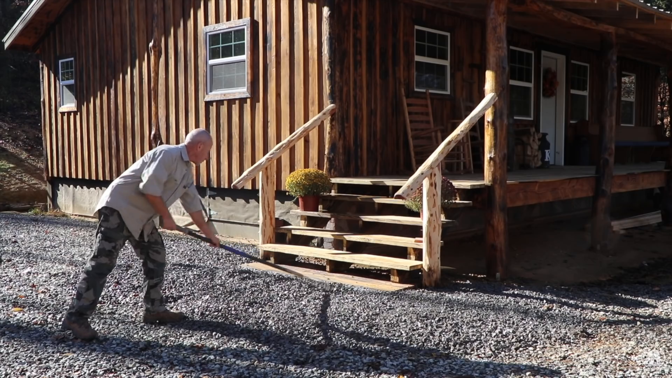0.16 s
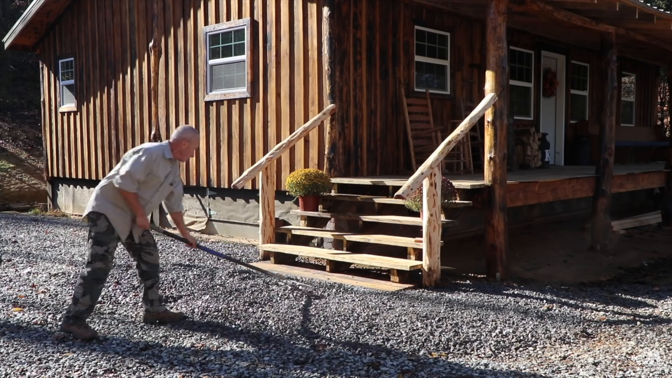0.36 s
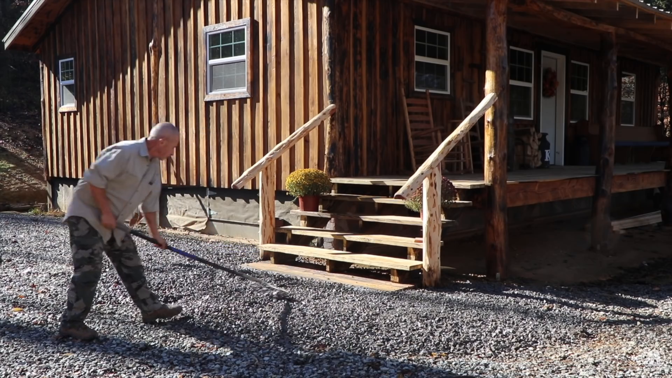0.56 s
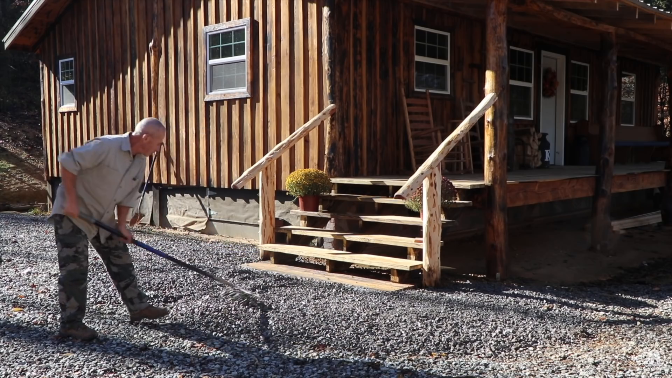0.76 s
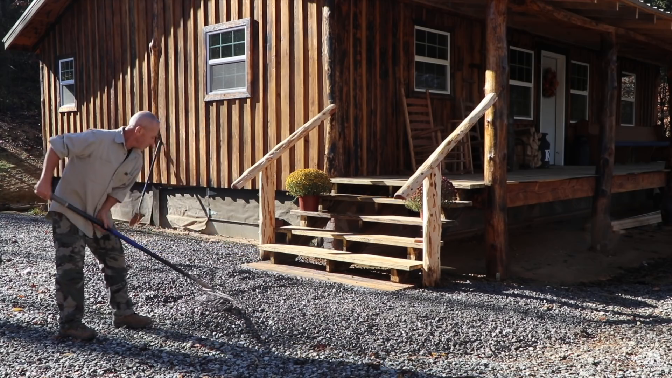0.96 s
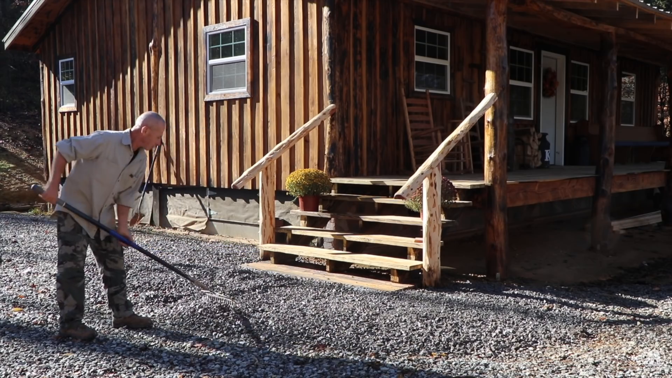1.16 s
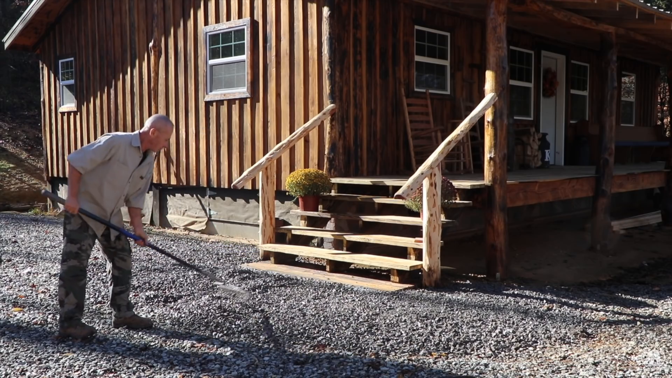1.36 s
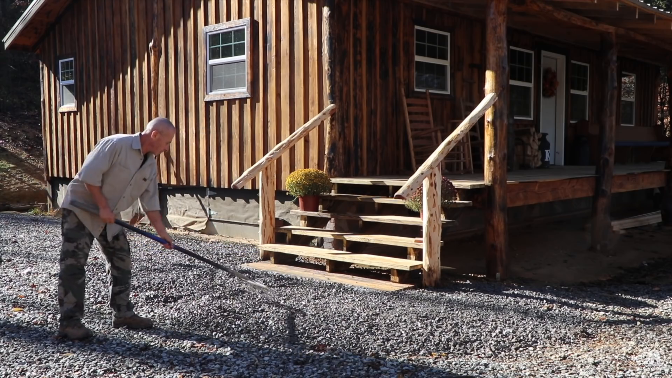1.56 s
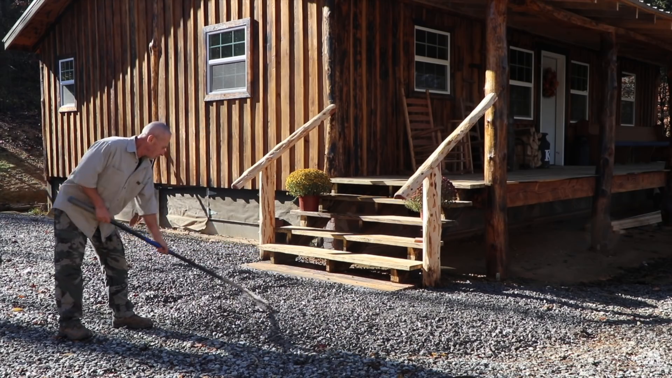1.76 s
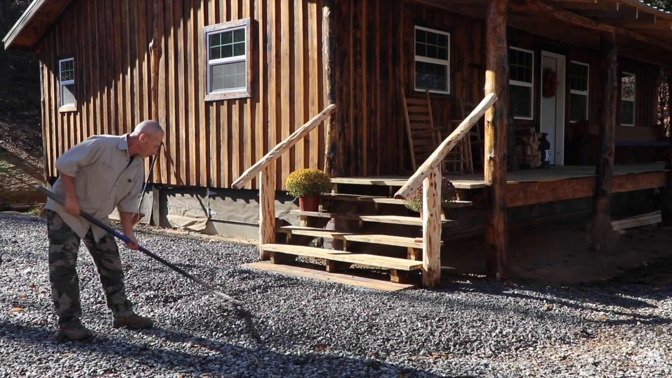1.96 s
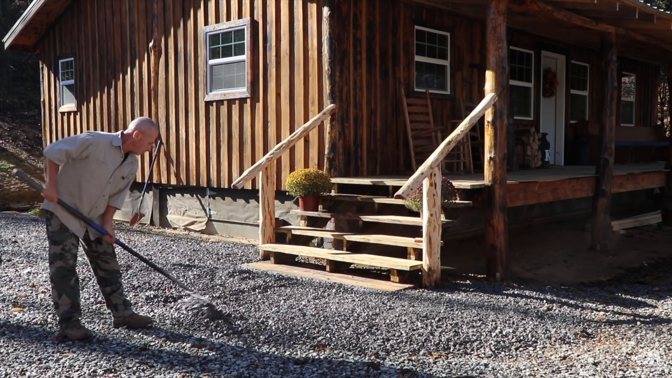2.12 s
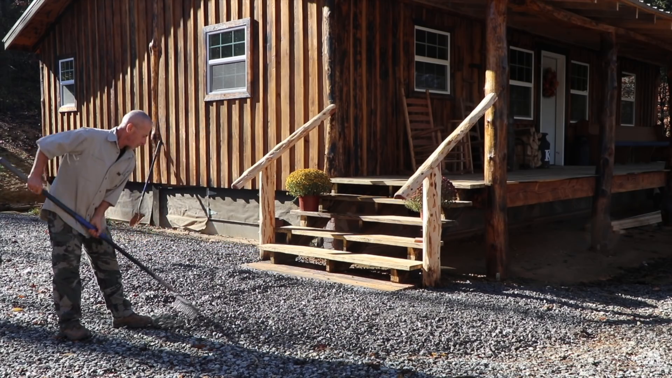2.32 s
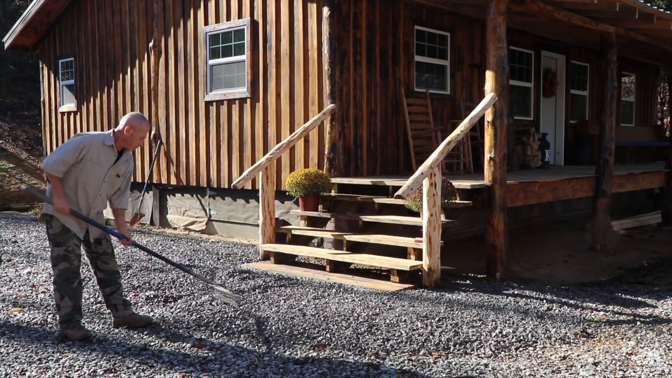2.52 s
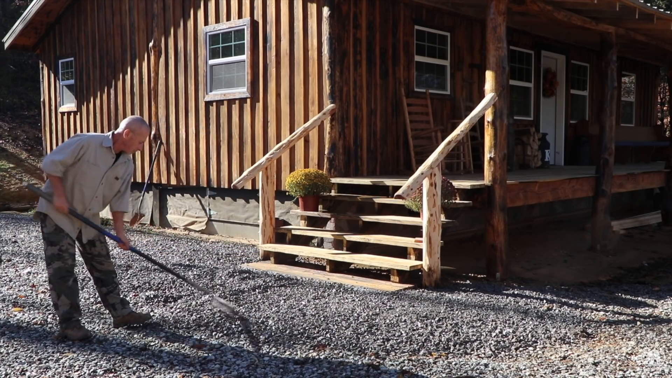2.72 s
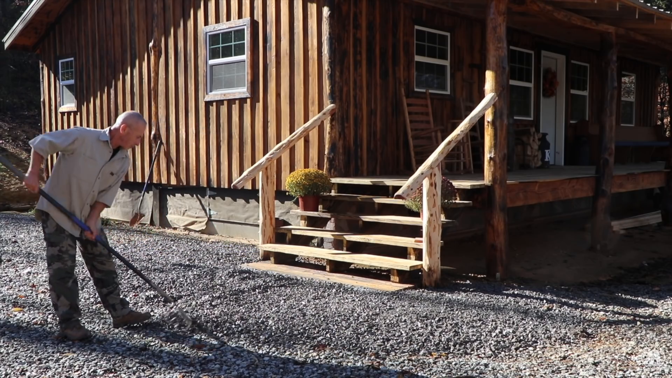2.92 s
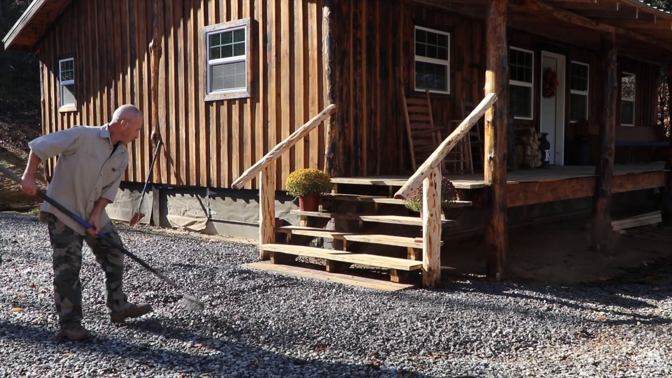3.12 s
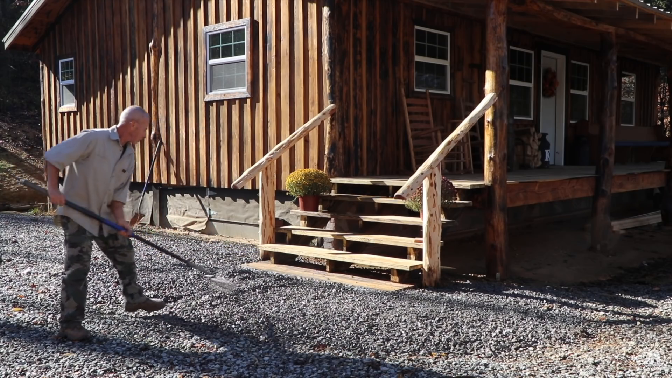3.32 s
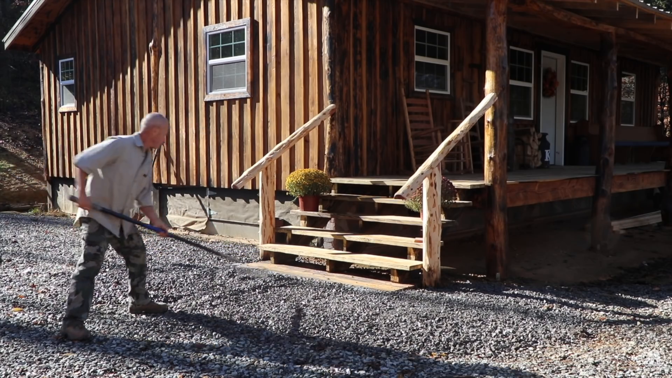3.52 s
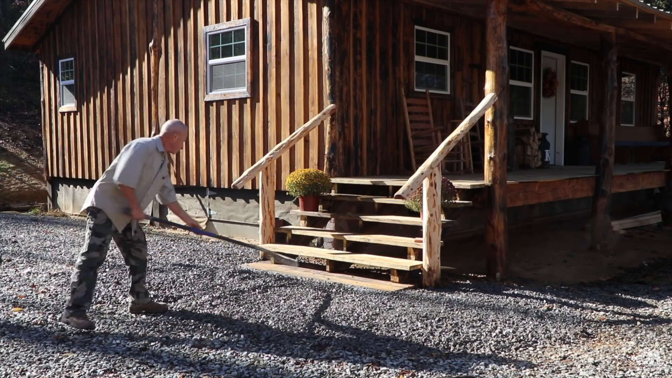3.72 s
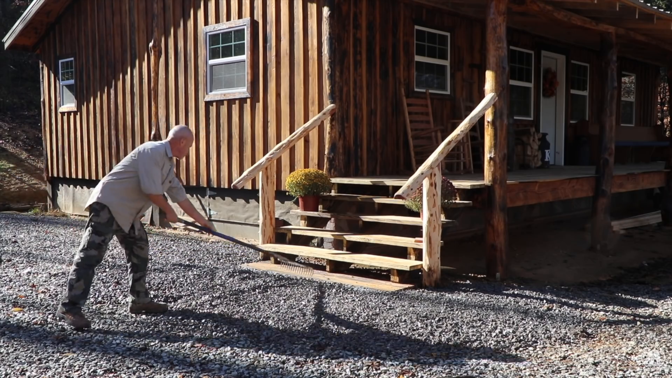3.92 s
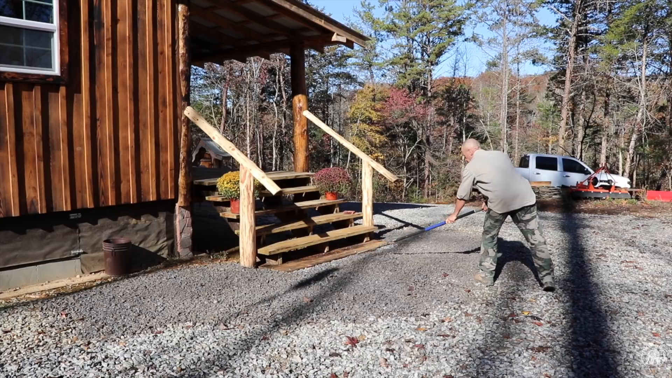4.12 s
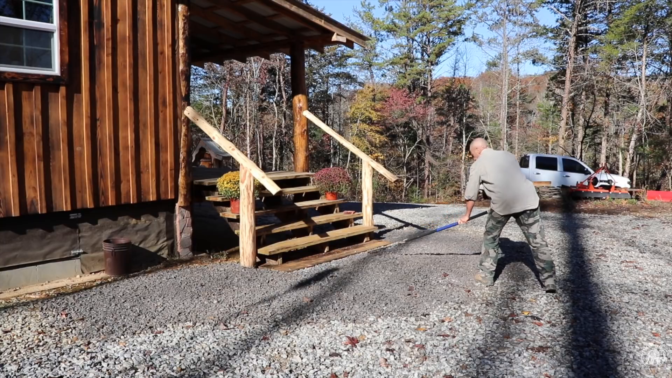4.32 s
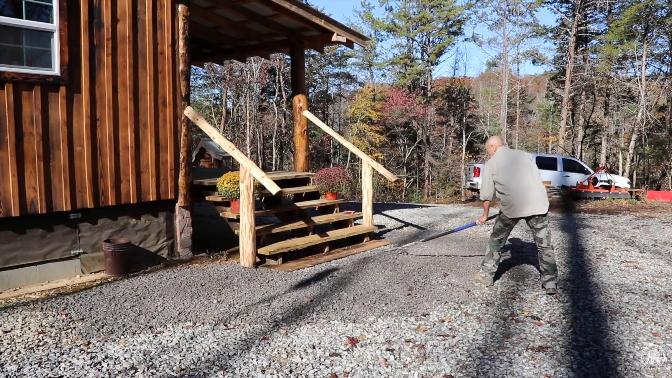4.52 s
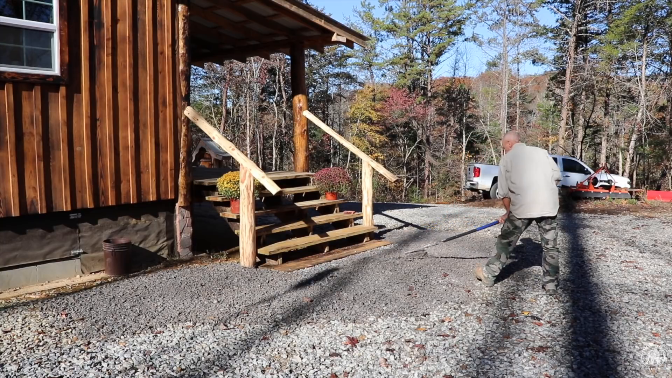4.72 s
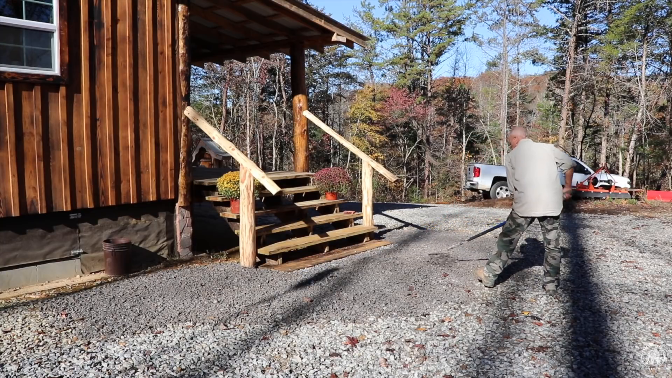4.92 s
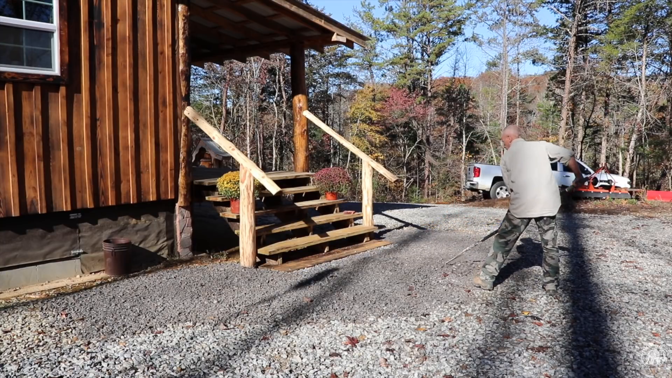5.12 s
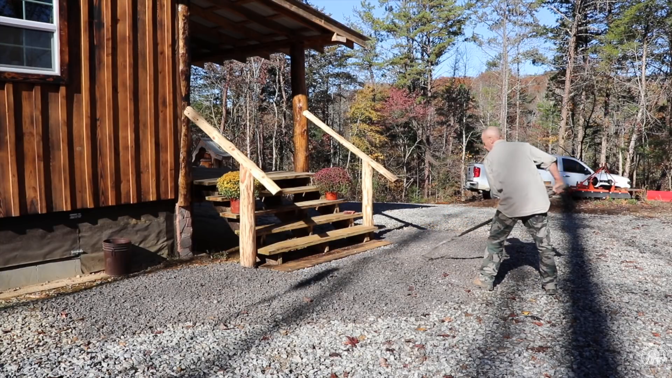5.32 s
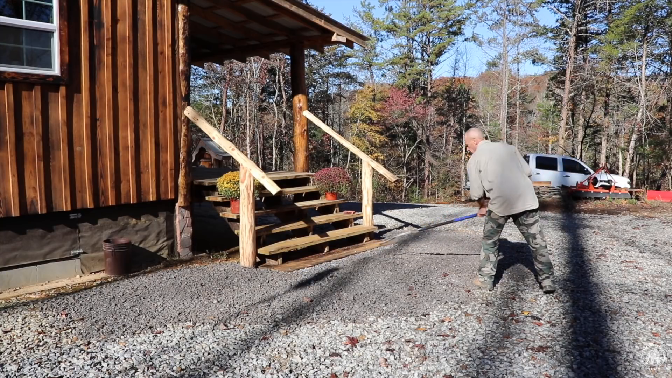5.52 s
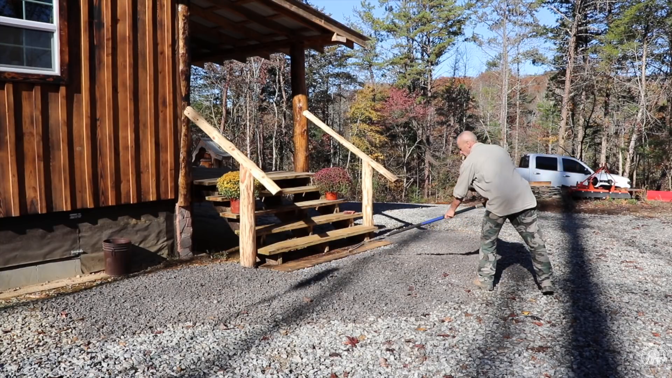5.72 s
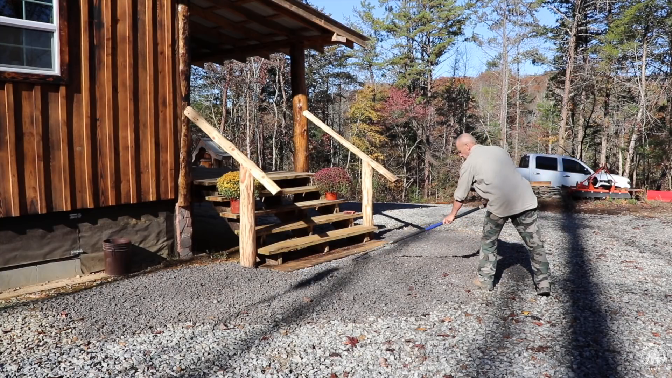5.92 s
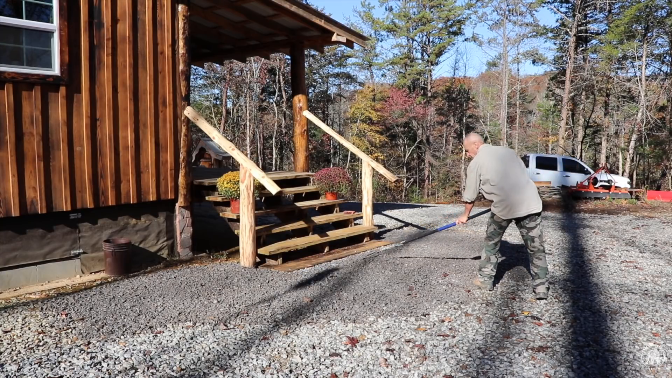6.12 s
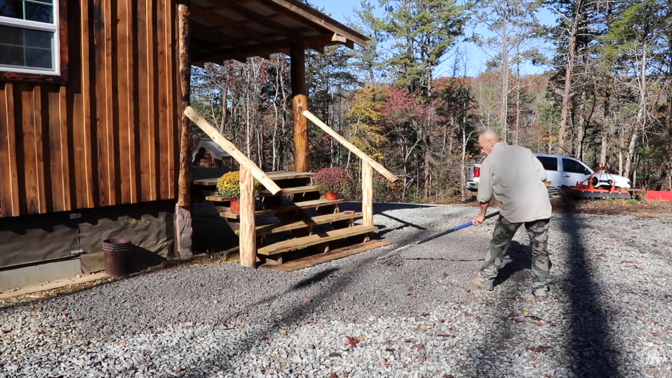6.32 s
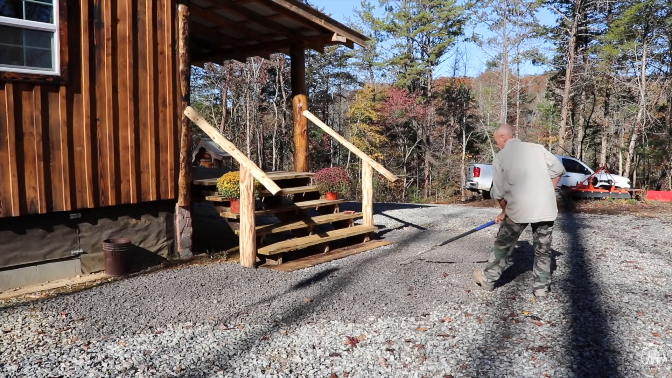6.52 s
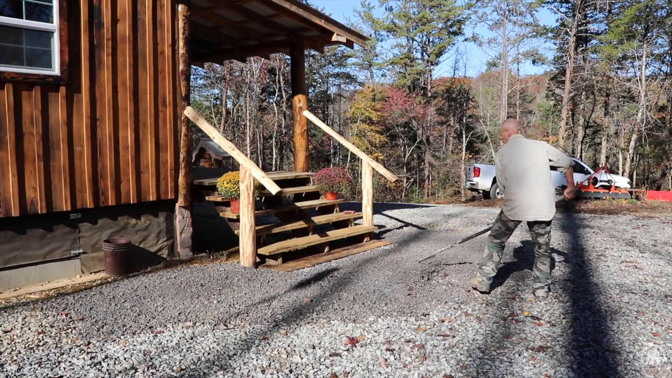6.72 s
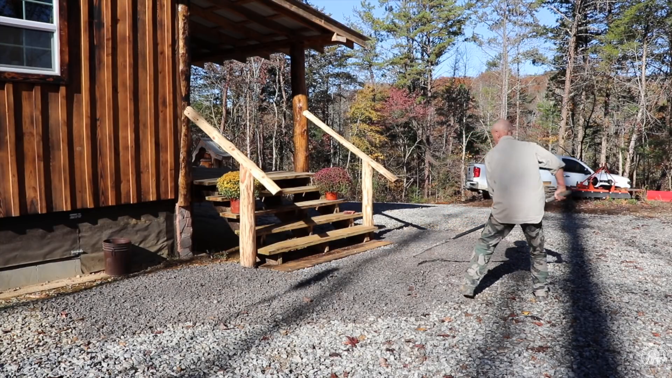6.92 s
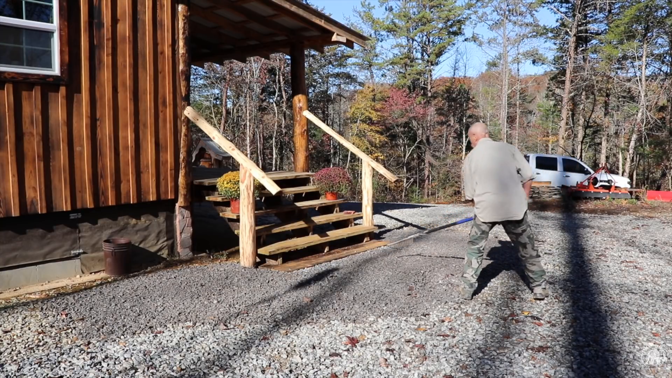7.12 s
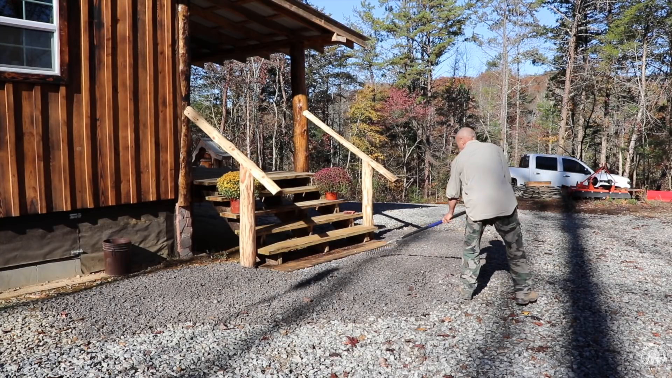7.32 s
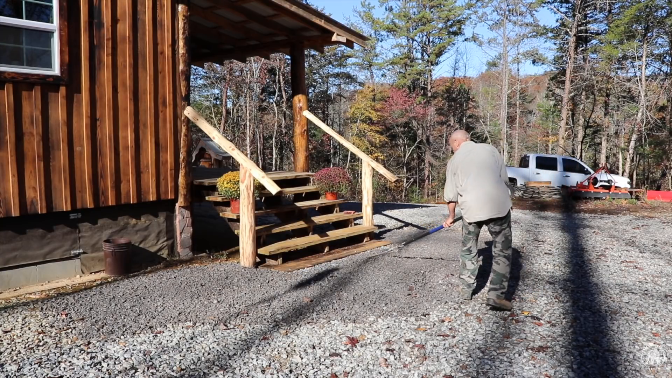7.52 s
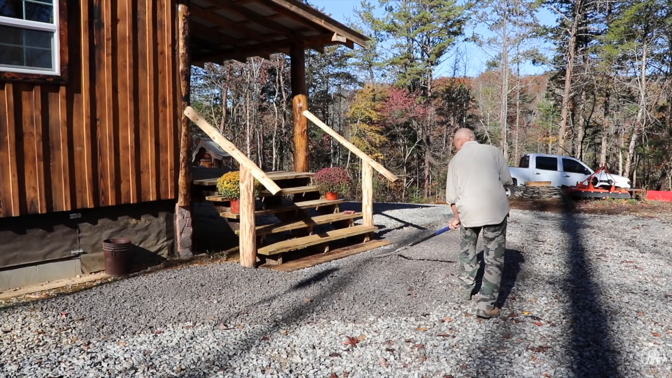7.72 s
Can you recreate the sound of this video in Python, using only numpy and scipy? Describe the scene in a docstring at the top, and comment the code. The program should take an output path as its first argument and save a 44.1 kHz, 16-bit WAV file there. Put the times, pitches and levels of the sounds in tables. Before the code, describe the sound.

A steel rake drags and shoves through loose gravel in uneven crunching strokes, tines ringing and clattering, outdoors beside a wooden cabin.

```python
"""A steel rake is pulled and pushed back through loose gravel by a wooden cabin, first from the side, then from behind.
The tines shove stones: random knocks in little slips ring stone modes and the steel, and fine chips spill after.
The landing head, struck stones and dull thuds are short filtered noise bursts; boots also grind on the drive.
The cabin wall throws back a short echo with a faint tail, over a quiet hush of outdoor air."""
import sys
import numpy as np
from scipy import signal
from scipy.fft import rfft, irfft
from scipy.io import wavfile
from scipy.ndimage import uniform_filter1d

SR = 44100
rng = np.random.default_rng(int(sys.argv[2]) if len(sys.argv) > 2 else 0)


def transcribe(u):
    """Save the signal u as a 16-bit wav file named by the first command-line argument.

    u: samples, shape (n,) or (channels, n), limited to [-1, 1]; the rate is SR.
    q: integer samples, one column per channel.
    """
    v = np.clip(np.atleast_2d(u).T, -1, 1)
    q = np.round(v * 32767).astype(np.int16)
    wavfile.write(sys.argv[1], SR, q)


N = 347067
TIME = np.arange(N) / SR

# Drags of the tines through the gravel; the bite is the pitch at which the steel rings most:
# (start [s], attack [s], drag [s], slowing [s], crunch before trim [dB], swell over the drag [dB],
#  heap re crunch [dB], chips re crunch [dB], first bite [Hz], last bite [Hz], ringing [dB])
STROKES = [(-.03, .11, .33, 0.77, -23.5, -2, 1, -12.5, 1200, 1650, 1.5),
           (.47, .05, .48, .25, -23, 1, -7, -12, 1680, 2950, 1),
           (1.125, 0.058, 0.2, 0.087, -33, 0.5, -8.5, -20, 2930, 2860, -3.5),
           (1.73, 0.077, 0.32, 0.67, -21.5, -1, -6, -12.5, 3420, 3720, -5.5),
           (2.695, .065, 0.18, 0.2, -19.5, -3, -5, -6.5, 3740, 4370, -7),
           (4.06, 0.094, .84, 0.51, -28, 4, -7.5, -14, 3060, 3254, -1.5),
           (5.245, 0.039, .12, .11, -28.5, -2.5, -3, -20, 960, 963, -2.5),
           (5.865, 0.023, 0.57, 0.31, -31, -1, -6.5, -10.5, 3270, 3800, -8.5),
           (6.39, 0.12, 0.14, 0.35, -27, 1, -8.5, -11.5, 4060, 4500, -11),
           (7.412, 0.031, 0.4, .2, -33.5, 2, 2, -10.5, 1090, 1225, 1.5)]
# Resonances of the rake head and its tines: (pitch [Hz], width [Hz], relative level [dB])
STEEL_MODES = [(1000, 570, -4), (1231, 190, -5.5), (1684, 270, 0.5), (1820, 440, -17), (2080, 240, 5),
               (2486, 380, -1.5), (2818, 210, 5), (2990, 480, 3.5), (3420, 540, 5.5), (4690, 580, 2.5),
               (5160, 310, -16)]
# The rake head drops on the gravel: (time [s], clatter peak [dB], crunch before trim [dB],
#  heap re crunch [dB], chips re crunch [dB])
LANDINGS = [(1.686, -16, -30.5, -6.5, -15), (2.669, -12, -23, -6.5, -12.5), (4.044, -16.5, -24, -13, -23.5),
            (5.266, -11, -34, -15, -15), (5.859, -11, -22.5, -10.5, -12.5), (7.422, -12.5, -27.5, 2.5, -14)]


def undb(db):
    """Decibels to amplitude gain."""
    return 10 ** (np.asarray(db) / 20)


def unit(x):
    """Scale to an RMS of one."""
    return x / np.sqrt(np.mean(x ** 2) + 1e-18)


def even(x, size=6600):
    """Unit level over each 0.15 s, keeping the crackle within it."""
    return x / np.sqrt(np.maximum(uniform_filter1d(x ** 2, size), 0) + 1e-18)


def band(x, lo_hz, hi_hz, order=3):
    """Butterworth band-pass."""
    edges_hz = [lo_hz, min(hi_hz, SR / 2 - 1)]
    return signal.sosfilt(signal.butter(order, edges_hz, "band", fs=SR, output="sos"), x + 1e-18)


def ring(x, hz, width_hz):
    """One resonance, gain 1 at its centre."""
    return signal.lfilter(*signal.iirpeak(min(hz, SR / 2 - 1), hz / width_hz, SR), x + 1e-18)


def colour(x, points, size=2048):
    """Minimum-phase filter through (pitch [Hz], level [dB]) points, so clicks keep their sharp front."""
    hz, db = np.transpose(points)
    bins_hz = np.arange(size // 2 + 1) * SR / size
    gain = undb(np.interp(np.log(bins_hz + 1), np.log(hz), db))
    # folding the cepstrum makes the response causal
    cepstrum = irfft(np.log(gain))
    cepstrum[1:size // 2] *= 2
    cepstrum[size // 2 + 1:] = 0
    response = irfft(np.exp(rfft(cepstrum)))
    return signal.fftconvolve(x, response)[:len(x)]


def add(out, s, x):
    """Mix x into out at s seconds."""
    i = max(int(s * SR), 0)
    out[i:i + len(x)] += x[:N - i]


def burst(decay_s, size=8192):
    """Noise that starts at once and dies away exponentially."""
    return rng.standard_normal(size) * np.exp(-TIME[:size] / decay_s)


def raking(gains, tone, knocks_per_s, spread_db, creep, ring_db, trims_db):
    """The harder the pull, the more stones knock; the heap rumbles below them and chips spill above."""
    # as the pull eases the creep dies first, leaving separate ticks
    effort = np.sqrt(gains[1] / gains[1].max())
    knocks = collisions(knocks_per_s * (.2 + effort), spread_db,
                        slips_per_s=130, slip_s=.0036, creep=creep * (.16 + effort))
    gravel = unit(colour(stones(knocks), tone))
    both = gravel + undb(ring_db) * tines(knocks)
    heap = band(both, 70, 1480, order=5)
    crunch = band(both, 1480, 6400, order=5)
    chips = band(gravel, 6400, 19000, order=5)  # the steel adds nothing up here
    return sum(even(part) * gain * undb(db)
               for part, gain, db in zip((heap, crunch, chips), gains, trims_db))


def collisions(rate, spread_db, slips_per_s, slip_s, creep):
    """Sizes of stone knocks: a creep, and little avalanches that start at once and run out."""
    slips = (rng.random(N) < slips_per_s / SR) * rng.random(N) ** 3  # mostly small, a few large
    push = creep + signal.lfilter([1], [1, -np.exp(-1 / (slip_s * SR))], slips)
    size = undb(spread_db * np.minimum(rng.exponential(size=N), 3.5)) * push
    return size * (rng.random(N) < rate / SR)


def patchy_noise(patchy_db=2.5, per_s=60):
    """Random strengths that swell and fade as different stones pass under the tines."""
    steps = np.clip(rng.standard_normal(2000), -2, 2)
    walk = np.interp(TIME * per_s, np.arange(2000), steps)
    return rng.standard_normal(N) * undb(patchy_db * walk)


def strike(knocks, chance):
    """Every knock meets a given mode with its own strength and sign."""
    return knocks * np.roll(chance, rng.integers(N))


def stones(knocks, sharpness=14, count=40):
    """Each knock rings its own mix of short stone modes."""
    chance = patchy_noise()
    pitches_hz = np.linspace(np.sqrt(130), np.sqrt(16000), count) ** 2  # closer together in the bass
    return sum(ring(strike(knocks, chance), hz, hz / sharpness + 60) for hz in pitches_hz)


def tines(knocks, focus=6.7, skirt=0.63, glide_half_width_hz=170, glide_db=-1):
    """The knocks ring the steel, most strongly around the bite pitch, where a gliding scrape sounds too."""
    bite_hz, bite_db = bite()
    chance = patchy_noise(patchy_db=2)
    low_pass = signal.butter(2, glide_half_width_hz, fs=SR, output="sos")
    scrape = signal.sosfilt(low_pass, strike(knocks, chance) + 1e-18)
    carrier = np.cos(2 * np.pi * np.cumsum(bite_hz) / SR)  # lifts the scrape to the bite pitch
    out = unit(scrape * carrier) * undb(glide_db)
    for hz, width, db in STEEL_MODES:
        share = skirt + np.exp(-(focus * np.log(hz / bite_hz)) ** 2)
        mode = ring(ring(strike(knocks, chance), hz, width), hz, 2 * width)
        out = out + unit(mode) * share * undb(db)
    return out * undb(bite_db)


def bite(lead_s=.04, ring_fall_db_per_s=35):
    """Pitch (Hz) and strength (dB) of the ringing: set as the tines go in, it glides over each drag, then fades."""
    hz, db = np.ones(N), np.zeros(N)
    for s, _, drag_s, *_, first_hz, last_hz, ring_db in STROKES:
        since = TIME >= s - lead_s
        age = TIME[since] - s
        hz[since] = first_hz * (last_hz / first_hz) ** np.clip(age / drag_s, 0, 1)
        db[since] = ring_db - ring_fall_db_per_s * np.maximum(age - drag_s, 0)
    return hz, db


def motion(start_s, attack_s, hold_s, release_s, crunch_db, heap_db, chips_db,
           settle_db=-14.5, settle_db_per_s=48):
    """Gains of heap, crunch and chips for one movement: it sets in, holds, slows, and the stones settle."""
    # How steeply (heap, crunch, chips) fade as the motion stops [exponent of speed]
    slowing_powers = (1.4, 1.5, 1)
    age = TIME - start_s
    late = np.maximum(age - hold_s, 0)
    speed = np.clip(1 - late / release_s, 0, 1)
    settling = undb(settle_db - settle_db_per_s * late)
    onset = np.clip(age / attack_s, 0, 1) * undb(crunch_db)
    return np.array([onset * undb(db) * np.maximum(speed ** power, settling)
                     for db, power in zip((heap_db, 0, chips_db), slowing_powers)])


def movements(chips_rise_db=5.5):
    """Everything that stirs the gravel, as (start in s, gains of heap, crunch and chips)."""
    # Gathered gravel pours off the tines late in a pull:
    # (start [s], length [s], crunch before trim [dB], chips re crunch [dB])
    spills = [(1.014, .12, -39.5, 3), (2.251, 0.075, -24.5, -3), (2.882, 0.19, -32, -3.5),
              (3.098, 0.082, -36.5, -8), (4.8, 0.4, -38.5, 2.5), (5.171, 0.22, -47.5, 3.5),
              (6.715, 0.14, -33.5, 0.5)]
    # A boot grinds on the drive: (start [s], length [s], crunch before trim [dB])
    shuffles = [(2.558, 0.12, -48), (3.417, 0.11, -44), (6.887, 0.14, -44)]
    for s, attack_s, drag_s, slowing_s, db, swell_db, heap_db, chips_db, *_ in STROKES:
        along = np.clip((TIME - s) / drag_s, 0, 1)
        shed_db = chips_db + chips_rise_db * (along - .5)  # more chips are shed as the drag goes on
        yield s, motion(s, attack_s, drag_s, slowing_s, db + swell_db * along, heap_db, shed_db)
    for s, _, db, heap_db, chips_db in LANDINGS:
        yield s, motion(s, .004, .02, .074, db, heap_db, chips_db)
    for s, length_s, db, chips_db in spills:
        yield s, motion(s, .064, length_s, .22, db, heap_db=-9, chips_db=chips_db)
    for s, length_s, db in shuffles:
        yield s, motion(s, .039, length_s, .25, db, heap_db=1, chips_db=-13)


def rake_head(x, ring_db=-5):
    """A direct blow, with the ring of the steel added."""
    steel = sum(undb(db) * ring(x, hz, width) for hz, width, db in STEEL_MODES)
    return x + undb(ring_db) * steel


def landings(scatter_s=0.0026):
    """The row of tines hits almost at once: a short clatter that rings the head."""
    out = np.zeros(N)
    for s, db, *_ in LANDINGS:
        clatter = burst(scatter_s)
        clatter = rake_head(band(clatter, 1860, 6200) + .5 * band(clatter, 680, 1300))
        add(out, s, clatter * undb(db) / np.abs(clatter).max())
    return out


def clacks(crack=0.32):
    """A stone is struck: it chatters for a few milliseconds in a broad band around its pitch."""
    # Single stones snap off a tine or a boot, or drop back on the heap: (time [s], peak [dB], pitch [Hz])
    stone_snaps = [(0.0315, -9.5, 3130), (0.5143, -7, 2094), (0.5911, -3.5, 2900), (0.7164, -5.5, 2140),
                   (0.9094, -6.5, 3191), (1.4733, -29.5, 10600), (1.781, -4, 3000), (1.9146, -3, 3690),
                   (1.9287, -7.5, 3380), (1.9932, -5.5, 4100), (2.0764, -9, 3140), (2.1906, -9, 3340),
                   (2.6015, -16.5, 2820), (2.7452, -3, 3680), (2.863, -7, 3840), (3.155, -17, 4700),
                   (3.21, -18, 5400), (3.2313, -17, 3410), (3.3109, -29, 3080), (3.3252, -28, 2830),
                   (3.459, -19.5, 3420), (3.555, -24.5, 2640), (3.7035, -36, 5600), (3.717, -33, 3120),
                   (4.156, -9, 3280), (4.1625, -13, 3280), (4.2154, -11.5, 3230), (4.2518, -6.5, 3220),
                   (4.6207, -9.5, 3270), (4.719, -5, 3050), (4.9053, -6.5, 2940), (5.5293, -25.5, 1210),
                   (5.88, -11, 3500), (6.2338, -18, 3620), (6.3943, -12.5, 4430), (6.6975, -10, 3270),
                   (6.9418, -20, 2570), (6.985, -10, 3570), (7.0926, -25, 1310), (7.1112, -28, 3700),
                   (7.433, -5.5, 2300)]
    out = np.zeros(N)
    for s, db, hz in stone_snaps:
        contact = np.sign(rng.standard_normal(2048)) * np.exp(-TIME[:2048] / .0028)
        pitched = band(contact, 0.67 * hz, 1.45 * hz, order=2)
        snap = rake_head(pitched + crack * band(contact, 520, 5900, order=1))
        add(out, s, snap * undb(db) / np.abs(snap).max())
    return out


def thuds(decay_s=0.016, width_hz=90, grit=0.43):
    """Weight comes down on the packed bed: a low knock with a little grinding."""
    # Dull knocks of boots and the rake: (time [s], peak [dB], pitch [Hz])
    dull_knocks = [(0.993, -24.5, 180), (1.842, -19, 213), (2.396, -26.5, 355), (3.438, -28.5, 381),
                   (3.509, -28.5, 350), (3.557, -28, 332), (4.398, -25.5, 225), (4.445, -21.5, 210),
                   (4.654, -22.5, 380), (6.941, -26.5, 367), (6.987, -20.5, 377.2), (7.638, -29.5, 180),
                   (7.682, -24, 239)]
    out = np.zeros(N)
    for s, db, hz in dull_knocks:
        press = burst(decay_s)
        knock = ring(band(press, 97, 1240, order=2), hz, width_hz)
        thud = knock + grit * band(press, 110, 770, order=2)
        add(out, s, thud * undb(db) / np.abs(thud).max())
    return out


def yard(x, wall_s=.018, wall_db=-20, tail_db=-23):
    """The cabin wall answers once; porch and trees add a faint dull tail."""
    response = band(burst(.06, size=32768), 250, 3500, order=1)
    response *= undb(tail_db) / np.linalg.norm(response)
    add(response, wall_s, undb(wall_db) * np.hanning(5) / 2)  # halved: the window sums to 2
    return x + signal.fftconvolve(x, response)[:N]


def air(level_db=-49):
    """Steady outdoor hush, mostly low: noise shaped by a smooth spectrum."""
    # Spectrum of outdoor air: (pitch [Hz], relative density [dB])
    hush_colour = [(15, -19), (25, -11.5), (87, 0), (236, -8.5), (427, -11), (734, -10), (1130, -17),
                   (6210, -26), (7710, -27), (16000, -29.5)]
    return unit(colour(rng.standard_normal(N), hush_colour, size=8192)) * undb(level_db)


def scene(turn_s=3.95):
    """The raking from both standpoints with its hits, in the yard; movements that overlap add in power."""
    # Colour of the gravel from each standpoint: (pitch [Hz], relative level [dB])
    side_colour = [(100, -18.5), (250, -13.5), (450, -8.5), (760, 5.5), (1000, 3), (1450, -7.5), (2400, -3),
                   (3500, 1.5), (5000, -3), (6800, -9), (11000, -16), (16000, -20)]
    rear_colour = [(100, -24.5), (250, -13), (520, -12), (950, -6.5), (1500, -10), (1780, -11), (2400, -8),
                   (3300, -2), (4200, -4.5), (5300, -4.5), (6800, -17), (13000, -19.5), (16000, -27.5)]
    side_power = rear_power = 0
    for s, gains in movements():
        if s < turn_s:  # movements that begin earlier are heard from the side, the others from behind
            side_power = side_power + gains ** 2
        else:
            rear_power = rear_power + gains ** 2
    trims_db = (.5, .3, .5)  # heap, crunch, chips
    side = raking(np.sqrt(side_power), side_colour, knocks_per_s=9000,
                  spread_db=2.54, creep=0.69, ring_db=-8.5, trims_db=trims_db)
    rear = raking(np.sqrt(rear_power), rear_colour, knocks_per_s=9000,
                  spread_db=1.04, creep=0.98, ring_db=-6.5, trims_db=trims_db)
    hits = landings() + clacks() + thuds()
    return (yard(side + rear + hits) + air())[None]


def record(dry, top_hz=15900):
    """A steep elliptic low-pass cuts the top treble."""
    return signal.sosfilt(signal.ellip(10, .2, 70, top_hz, fs=SR, output="sos"), dry)


dry = scene()
out = record(dry)
transcribe(out)
```